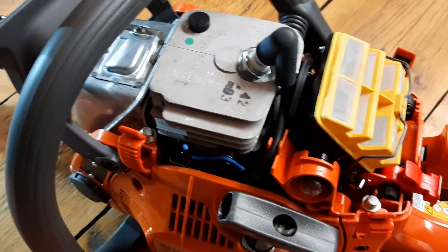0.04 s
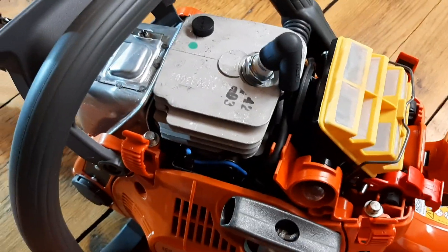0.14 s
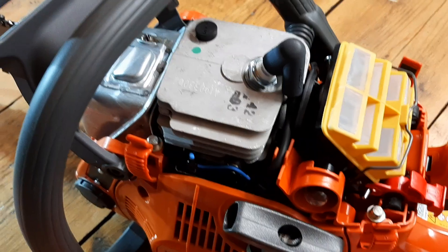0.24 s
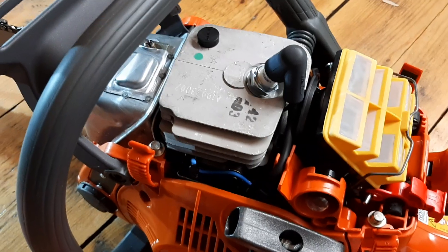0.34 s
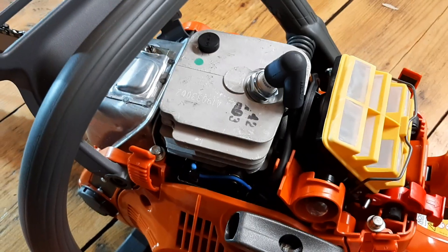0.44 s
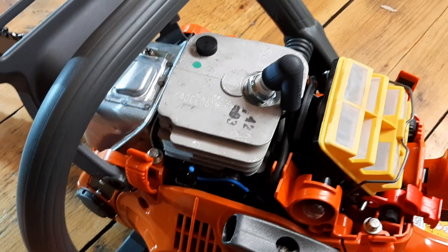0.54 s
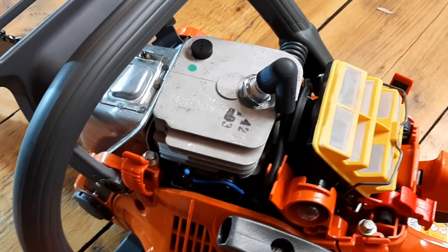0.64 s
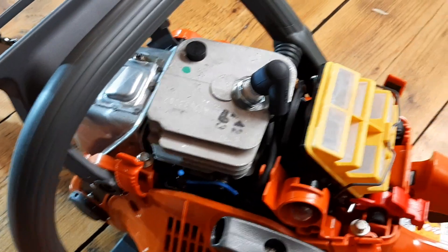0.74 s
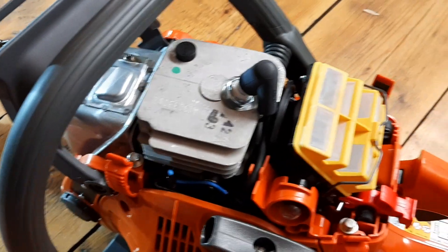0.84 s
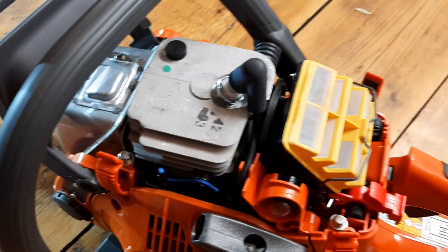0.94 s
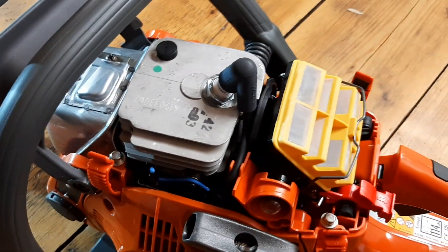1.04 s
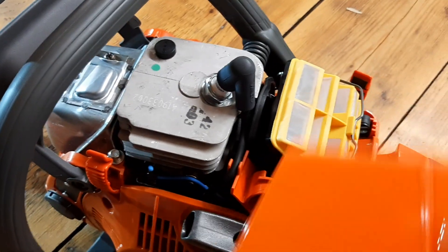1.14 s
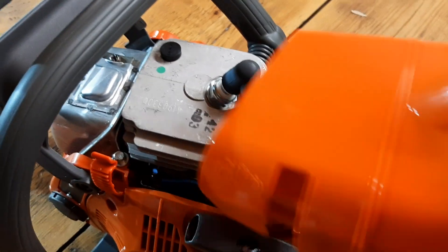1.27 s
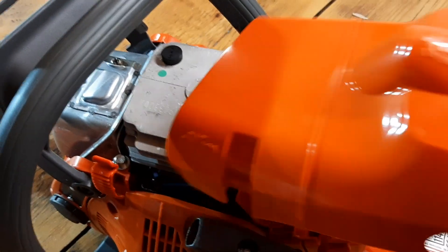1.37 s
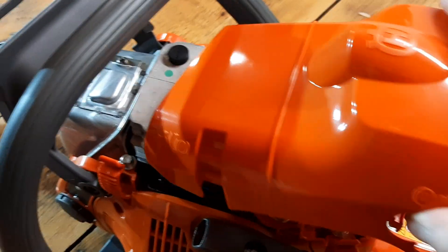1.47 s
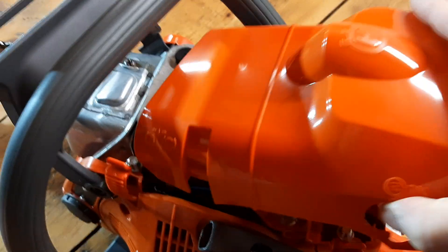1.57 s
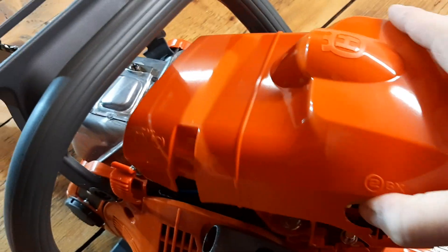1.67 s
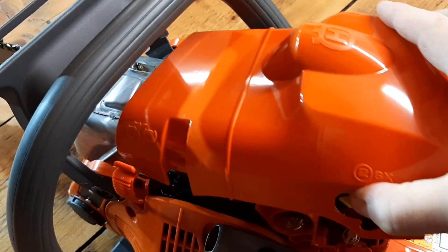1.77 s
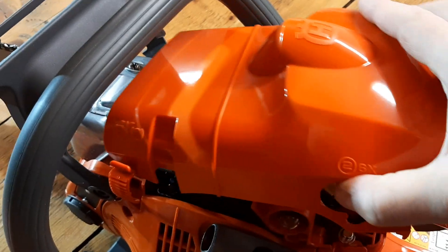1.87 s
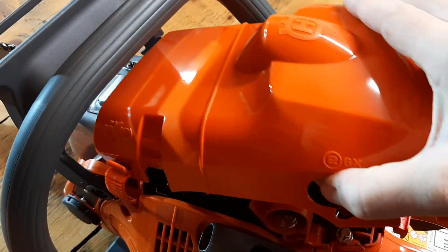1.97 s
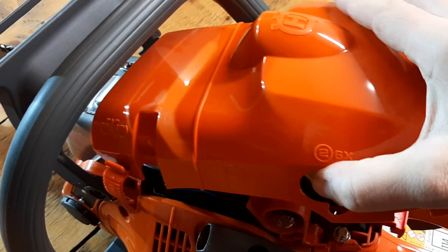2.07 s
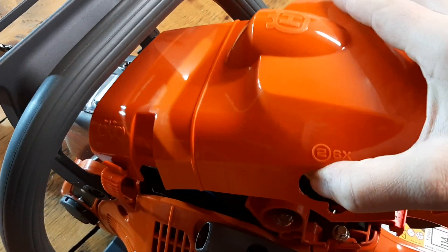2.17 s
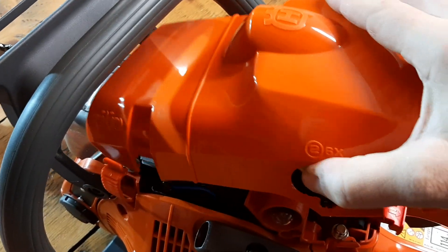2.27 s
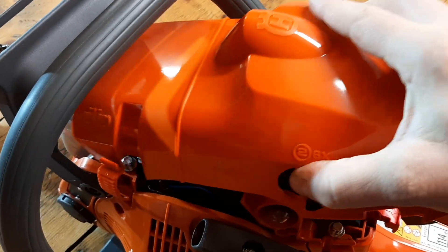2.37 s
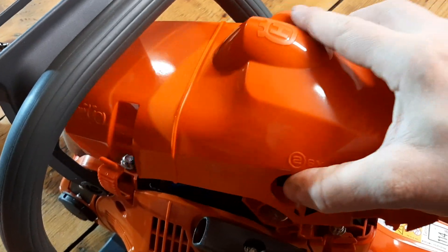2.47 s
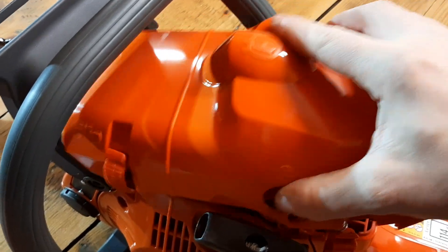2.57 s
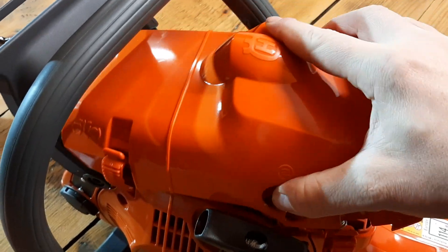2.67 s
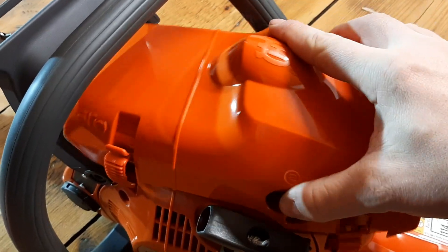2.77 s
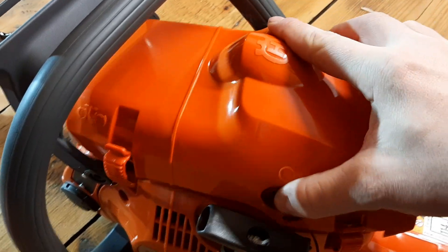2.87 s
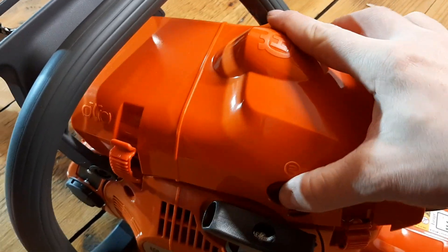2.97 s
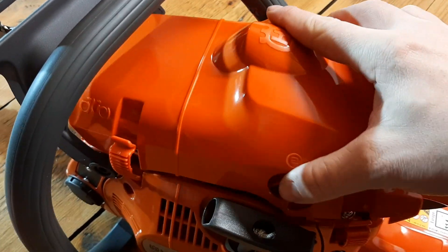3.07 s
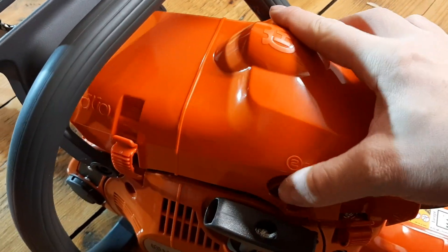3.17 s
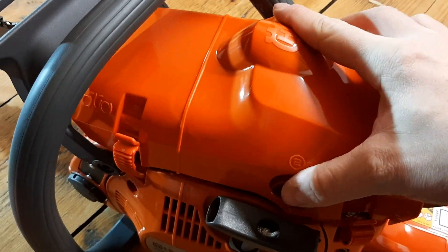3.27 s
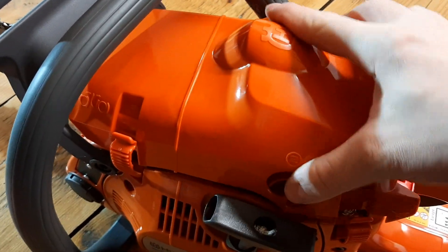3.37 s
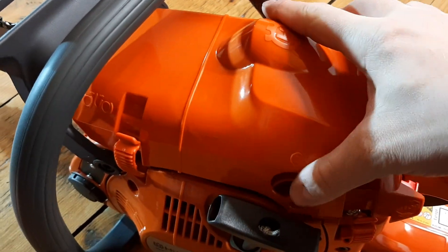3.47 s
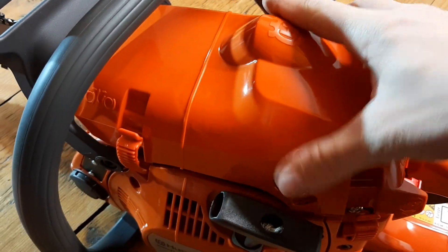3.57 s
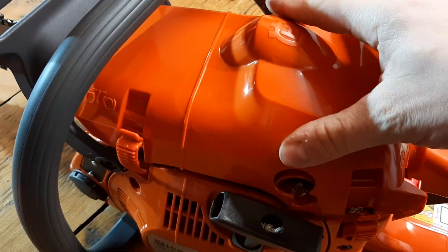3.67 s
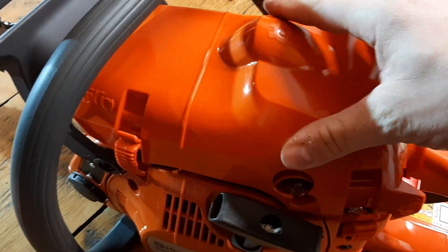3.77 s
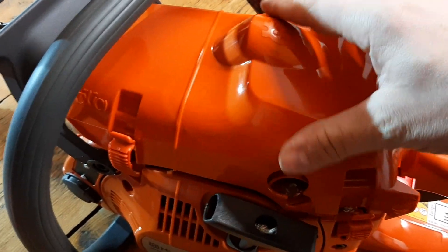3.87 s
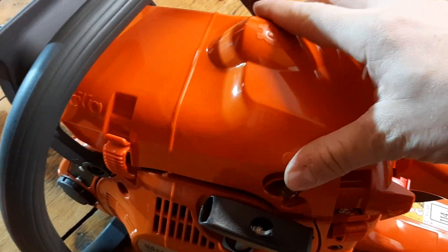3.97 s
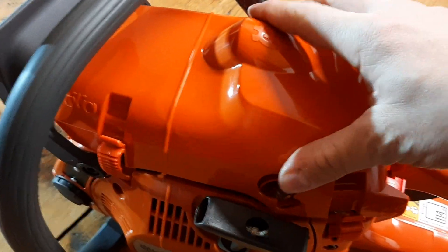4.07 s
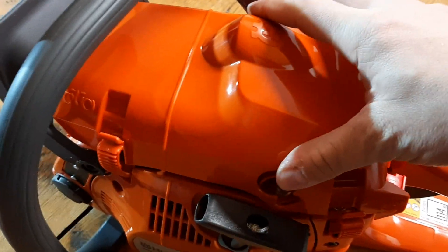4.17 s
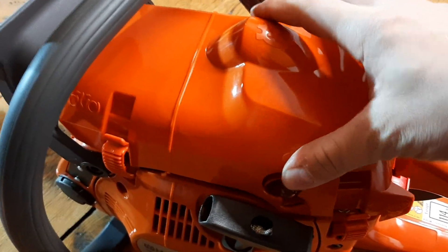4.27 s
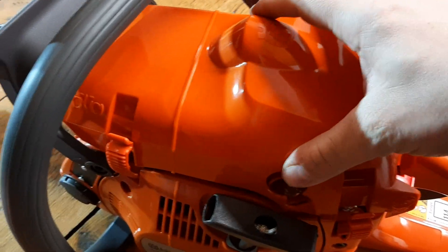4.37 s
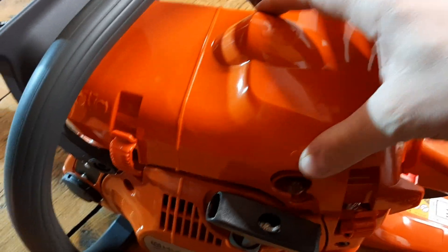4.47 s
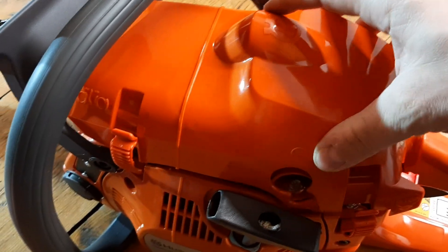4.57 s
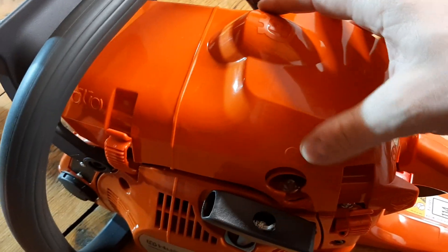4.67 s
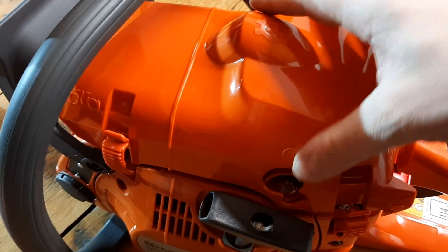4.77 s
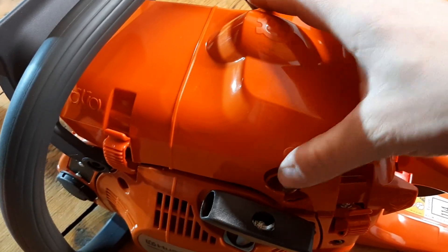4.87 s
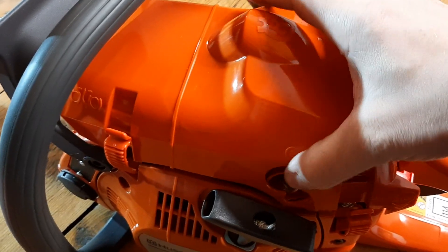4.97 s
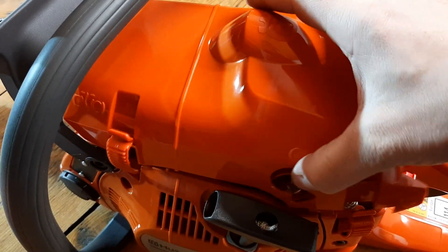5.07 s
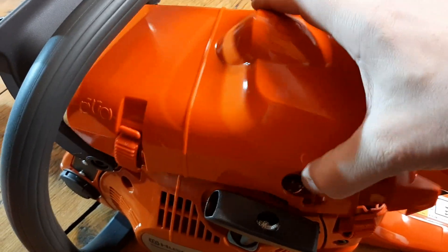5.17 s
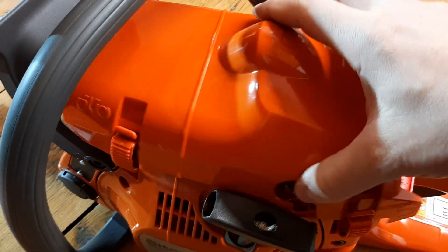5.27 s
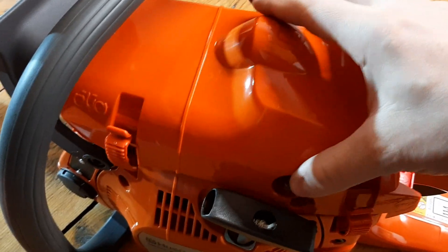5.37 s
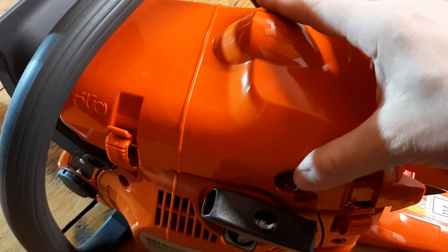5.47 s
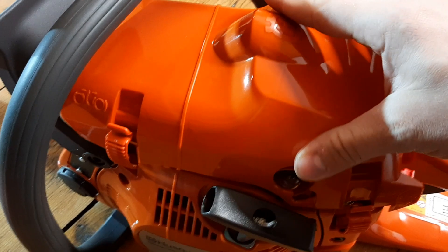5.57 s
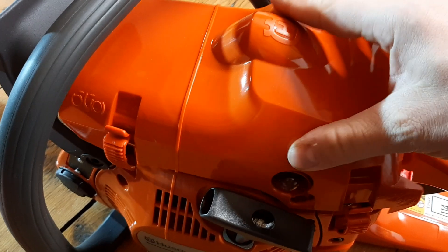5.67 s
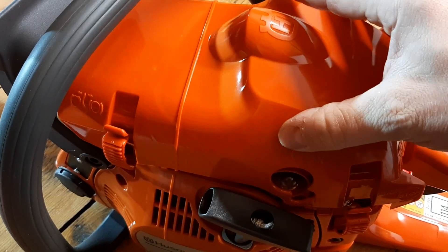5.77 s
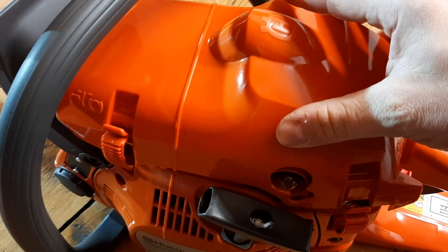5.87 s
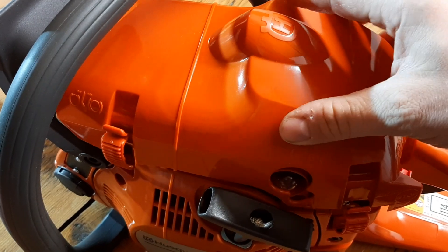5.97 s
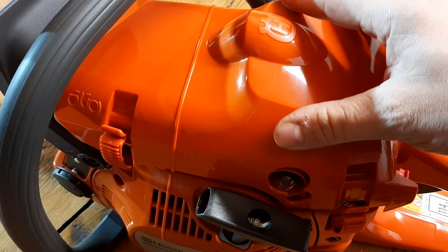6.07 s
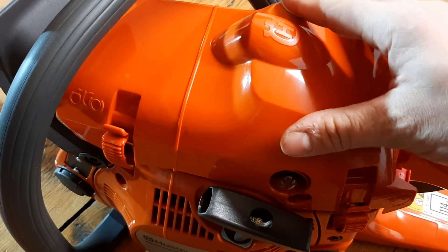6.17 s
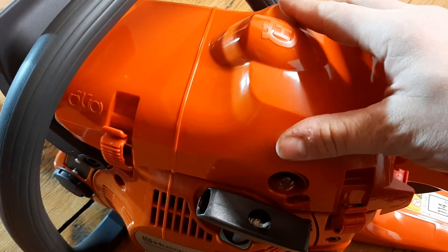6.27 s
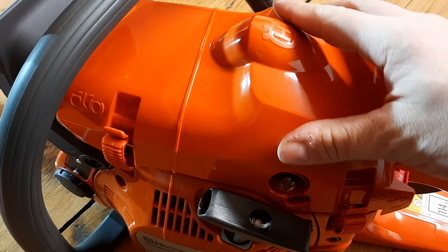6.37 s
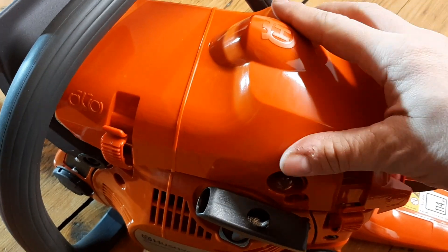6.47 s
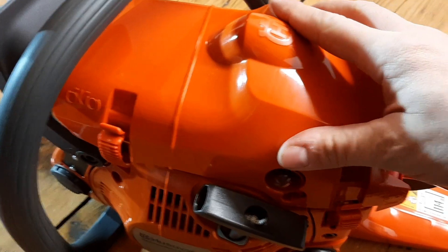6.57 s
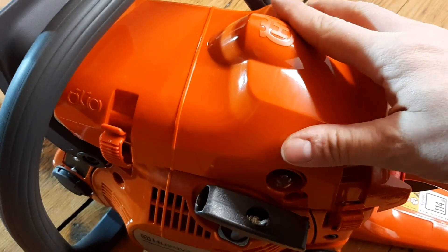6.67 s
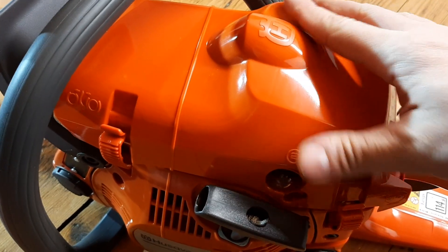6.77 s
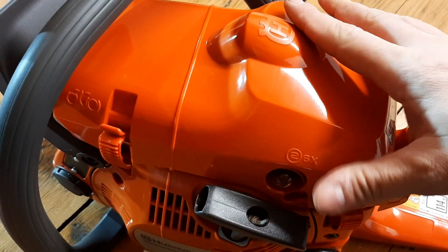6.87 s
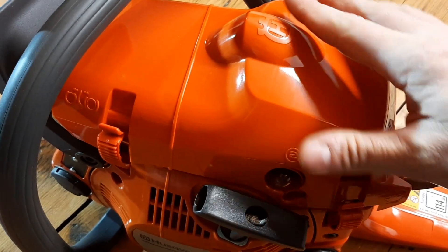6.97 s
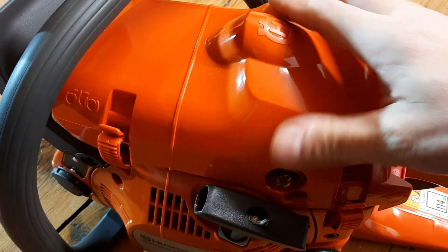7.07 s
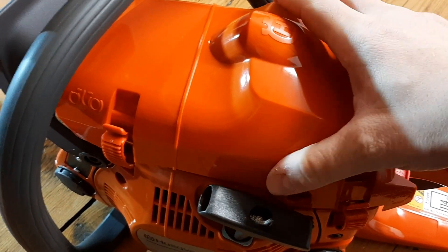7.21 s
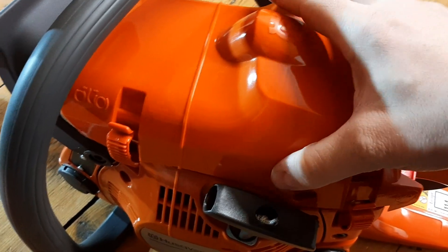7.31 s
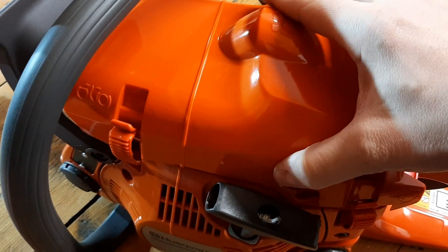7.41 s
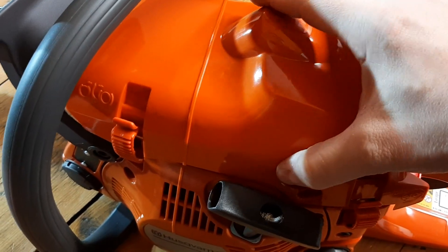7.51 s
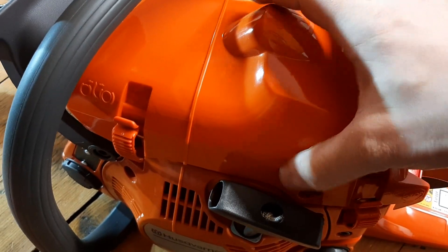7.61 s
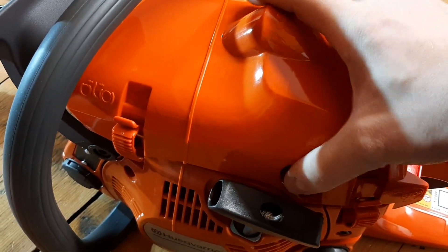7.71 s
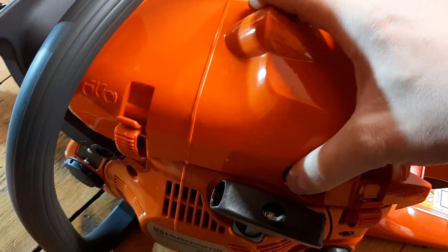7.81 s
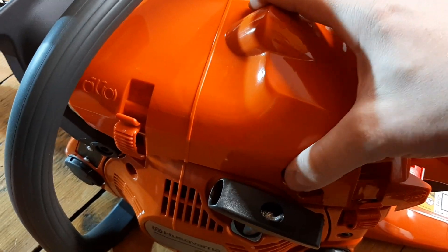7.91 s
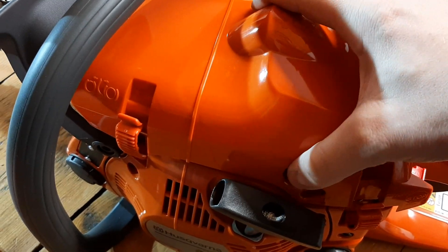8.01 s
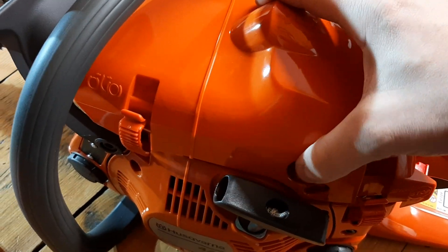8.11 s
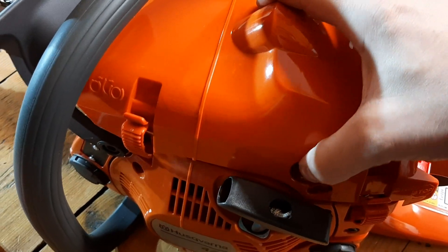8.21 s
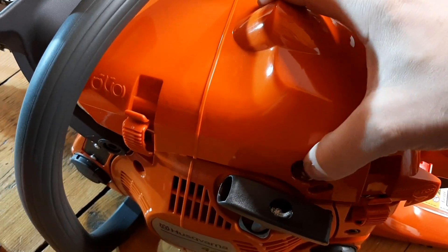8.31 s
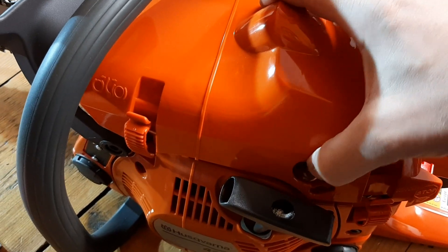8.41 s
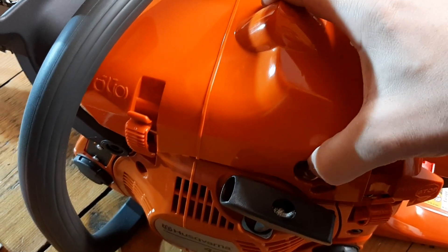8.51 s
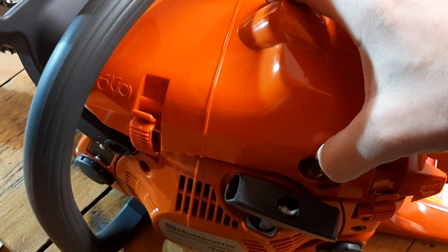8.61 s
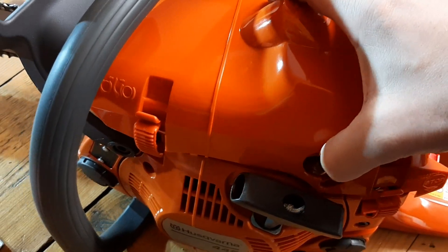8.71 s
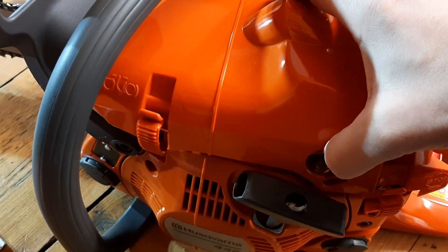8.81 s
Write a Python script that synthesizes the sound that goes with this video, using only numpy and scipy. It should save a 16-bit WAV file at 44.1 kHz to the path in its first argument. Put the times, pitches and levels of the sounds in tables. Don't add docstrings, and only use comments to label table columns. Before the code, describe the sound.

Close hollow plastic clatter and scraping, a burst of loud cracks with a tiny squeak, then scattered clicks and knocks in a quiet room.

```python
import sys
import numpy as np
from scipy import signal
from scipy.fft import rfft, irfft, next_fast_len
from scipy.io import wavfile
from scipy.ndimage import uniform_filter1d

SR = 44100
rng = np.random.default_rng(int(sys.argv[2]) if len(sys.argv) > 2 else 0)


def log_audio(samples):
    frames = np.atleast_2d(samples).T
    limited = np.clip(frames, -1, 1)
    pcm = np.round(limited * 32767).astype(np.int16)
    wavfile.write(sys.argv[1], SR, pcm)


def invert_db(level):
    return 10 ** (np.asarray(level, dtype=float) / 20)


N = 390285
MIC_LOW_HZ = 186

# frequency in Hz, level in dB, t60 in s.
BOARD_MODES = [(100, 0, .14), (140, 1, .15), (215, -9, .08), (328, -5, .11), (577, -22, .1)]


def level(x, db):
    return x * invert_db(db) / np.sqrt(np.mean(x ** 2))


def band(x, lo_hz, hi_hz, order=2):
    return signal.sosfilt(signal.butter(order, [lo_hz, hi_hz], "band", fs=SR, output="sos"), x)


def coloured(x, points):
    hz, db = np.transpose(points)
    size = 2 * next_fast_len(N // 2 + 1)
    f = np.maximum(np.arange(size // 2 + 1) * SR / size, 1)
    gain = invert_db(np.interp(np.log(f), np.log(hz), db, -99, -99))
    return level(irfft(rfft(x, size) * gain, size)[:, :N], 0)


def add(out, s, x):
    i = max(int(s * SR), 0)
    out[:, i:i + x.shape[1]] += x[:, :N - i]


def walk(rate_hz):
    k = int(SR / rate_hz)
    return uniform_filter1d(np.repeat(rng.standard_normal(N // k + 1), k), k)[:N]


def ring(modes, scatter_db, detune, spread, size=8192):
    port_lag_s = .000025
    hz, db, t60 = np.transpose(modes)[:, :, None]
    c = rng.standard_normal((3, len(modes), 1))
    t = np.arange(size) / SR
    hz = hz * (1 + detune * c[0])
    uptake = np.minimum(2.11 * hz * t, 1)
    swing = np.exp((2j * np.pi * hz - np.log(1000) / t60) * t) * uptake
    skew = np.pi * hz * port_lag_s + spread * c[2] * np.minimum(hz / 2000, 1)
    ports = invert_db(db + scatter_db * c[1]) * np.exp(1j * skew * np.array([1, -1]))
    return (ports.T @ swing).imag


def strike(response, contact_ms, db, rattle, spike_db=3.5, spike_s=0.00032):
    t = np.arange(2048) / SR
    push = rattle * rng.standard_normal(len(t)) ** 3 * np.exp(-t * 1000 / np.clip(contact_ms, .3, 30))
    push[0] = 1
    x = signal.fftconvolve(response, push[None])
    x = x * invert_db(spike_db * np.exp(-np.arange(x.shape[1]) / SR / spike_s))
    return x * invert_db(db) / np.abs(x.mean(axis=0)).max()


def air():
    # frequency in Hz, density in dB per Hz.
    air_spectrum = [(18, -40), (30, -7.5), (135, 1), (465, -11), (605, -2), (1050, -23.5), (3270, -16.5),
                    (5250, -8.5), (8220, -23), (15100, -19.5), (16300, -23.5)]
    n = rng.standard_normal((3, N))
    bass = signal.sosfilt(signal.butter(1, 600, fs=SR, output="sos"), n[0] - n[1:])
    tone = coloured(n[1:] + bass, air_spectrum)
    return level(tone, -71) * invert_db(0.67 * walk(26))


def room(x):
    # centre in Hz, t60 in s, level in dB.
    tail_bands = [(270, 0.12, -21.5), (650, 0.48, -19), (2130, 0.62, -16), (4960, 0.3, -22),
                  (11100, 0.029, -16.5)]
    t = np.arange(SR // 2 + SR // 4) / SR
    onset = np.minimum(t / 0.0056, 1)
    tail = 0
    for hz, t60, db in tail_bands:
        n = band(rng.standard_normal((3, len(t))), hz / 2.0, hz * 1.92)
        alike = np.clip(500 / hz, 0, 3)
        ports = (alike * n[0] + n[1:]) / np.sqrt(1 + alike ** 2)
        tail = tail + invert_db(db - 23.0 - 60 * t / t60) * ports * onset
    return signal.fftconvolve(x.mean(axis=0)[None], tail)[:, :N]


def machine_bumps(out):
    # time in s, peak in dB.
    bumps = [(7.633, -30), (7.758, -39.5), (7.808, -40), (7.973, -38.5), (8.075, -50.5), (8.141, -39.5),
             (8.26, -49), (8.392, -39), (8.615, -43.5), (8.659, -45), (8.716, -49)]
    for s, db in bumps:
        add(out, s, strike(ring(BOARD_MODES, 2.5, .04, .2), 12.8, db, rattle=.06))


def catch_ticks(out):
    # frequency in Hz, level in dB, t60 in s.
    catch_modes = [(1555, -6, .03), (5300, -10, .012)]
    # time in s, peak in dB.
    ticks = [(6.686, -66), (6.758, -63), (6.814, -65), (6.869, -67.5), (6.935, -61.5), (7.001, -61),
             (7.064, -59), (7.113, -55), (7.166, -61.5), (7.462, -59.5), (7.505, -51), (7.796, -57.5),
             (7.844, -63), (7.9, -56.5), (7.956, -60), (8.108, -60.5), (8.159, -70), (8.204, -68),
             (8.253, -64.5), (8.31, -57), (8.355, -64), (8.406, -66), (8.459, -65), (8.55, -60),
             (8.597, -64.5), (8.643, -73), (8.692, -74), (8.745, -62), (8.792, -63), (8.836, -66)]
    for s, db in ticks:
        response = ring(catch_modes, 1, .004, 0.92, size=1536)
        add(out, s, strike(response, 4.7, db + 4.0, rattle=0.09, spike_db=-39))


def rim_squeak(out):
    # frequency in Hz, level in dB, t60 in s.
    rim_modes = [(7500, -1.5, .012), (7100, -9, .008)]
    # time in s, peak in dB.
    slips = [
        (2.593, -23),
        (2.6065, -24.5),
        (2.611, -23.5),
        (2.6146, -23),
        (2.62, -16.5),
    ]
    for s, db in slips:
        response = ring(rim_modes, 1.0, .006, 0.8, size=768)
        add(out, s, strike(response, 0.86, db, rattle=.3, spike_db=-11.5))


def small_parts():
    out = np.zeros((2, N))
    machine_bumps(out)
    catch_ticks(out)
    rim_squeak(out)
    return band(out, 126, 6200)


def grit(rate_hz, scatter_db):
    c = rng.random((3, N))
    return (c[0] < rate_hz / SR) * np.sign(c[1] - .5) * invert_db(-scatter_db * np.log(c[2] + .01))


def strokes(table, rise_db_s, fall_db_s):
    rest_db = -88
    start, hold, *layers = np.transpose(table)[:, :, None]
    t = np.arange(N // 64 + 2) * 64 / SR
    shape_db = -rise_db_s * np.maximum(start - t, 0) - fall_db_s * np.maximum(t - start - hold, 0)
    power = [np.sum(invert_db(db + shape_db) ** 2, axis=0) + invert_db(rest_db) ** 2 for db in layers]
    return [np.interp(np.arange(N) / SR, t, 10 * np.log10(p)) for p in power]


def board_rumble(rumble_db):
    slips = grit(340, 4.2)[None] * invert_db(rumble_db - 2.0 + 2.6 * walk(27))
    return signal.fftconvolve(slips, ring(BOARD_MODES[:4], .1, .001, .2))[:, :N]


def shell_judder(judder_db):
    # frequency in Hz, level in dB, t60 in s.
    judder_modes = [(250, -6, .05), (335, 2.5, .055), (430, -2, .05), (525, -6, .045), (740, -5, .05),
                    (845, -11, .03), (1080, -14, .025)]
    pitch_ratios = (.86, 1, 1.14)
    out = np.zeros((2, N))
    for ratio in pitch_ratios:
        shell = ring(np.array(judder_modes) * [ratio, 1, 1], .1, .001, 0.33, size=3072)
        slips = grit(400, 2.7)[None] * invert_db(judder_db - 4.5 + 5.7 * walk(27))
        out += signal.fftconvolve(slips, shell)[:, :N]
    return out


def edge_scrape():
    # frequency in Hz, density in dB per Hz.
    scrape_spectrum = [(470, -14), (800, -6), (1070, -9), (1250, -3), (1830, -3), (2500, -1), (3200, -4),
                       (3700, -2.5), (6150, -5), (9500, -26), (12400, -43.5), (20900, -120)]
    seated_s = 3.5
    fine = np.array([grit(5000, 2.6) for _ in range(3)])
    scrape = coloured(fine[0] * 0.42 + fine[1:], scrape_spectrum)
    cavity = 0.65 * band(scrape, 3530, 4130) - 0.45 * band(scrape, 2300, 3200)
    return scrape + (np.arange(N) > seated_s * SR) * cavity


def skin_hiss(hiss_db, scrape_db):
    # frequency in Hz, density in dB per Hz.
    skin_spectrum = [(4710, -34.5), (8000, -3), (9400, -3), (12500, -1), (15700, -4), (16300, -6)]
    hiss = coloured(rng.standard_normal((2, N)), skin_spectrum)
    return hiss * (invert_db(hiss_db + 0.75 * walk(25)) + invert_db(scrape_db - 18.0))


def sliding():
    # start in s, hold in s, judder in dB, edge scrape in dB.
    slides = [(0, 0.047, -41, -52.5), (.17, 0.025, -36, -46.5), (.34, 0.15, -36.5, -52.5),
              (.54, 0.17, -55.5, -51), (.73, 0.093, -81, -47.5), (.85, 0.051, -55.5, -53.5),
              (.97, 0.049, -62, -52), (1.07, 0.19, -80, -62), (1.35, 0.37, -55, -60),
              (1.645, 0.015, -30, -41), (1.7, 0.12, -40, -48.5), (1.86, 0.13, -39.5, -52),
              (2.19, 0.01, -41.5, -51.5), (2.32, 0.11, -38.5, -48), (2.51, 0.091, -32, -44),
              (2.56, 0.039, -48, -27), (2.74, 0.12, -48.5, -48), (2.95, 0.23, -56, -62.5),
              (3.2, 0.1, -62, -54)]
    # start in s, hold in s, judder in dB, edge scrape in dB.
    rubs = [(3.674, 0.15, -51.5, -57), (3.899, 0.01, -71, -53), (3.981, 0.12, -51.5, -55.5),
            (4.32, 0.055, -51, -64), (4.423, .1, -51, -54), (4.843, 0.058, -71, -61.5),
            (5.103, 0.12, -38, -46.5), (5.301, 0.3, -50.5, -63.5), (5.649, 0.028, -47.5, -61),
            (5.7, 0.007, -56, -50.5), (6.002, 0.12, -41.5, -60), (6.135, 0.17, -55, -61),
            (6.422, 0.015, -52.5, -55), (6.498, 0.058, -61.5, -68.5), (7.109, 0.088, -66.5, -63),
            (7.286, 0.058, -68, -61.5), (7.33, 0.017, -57.5, -52), (7.41, 0.065, -65, -59.5),
            (7.626, 0.011, -48.5, -51.5), (7.697, 0.045, -43, -60), (7.872, 0.028, -51, -61),
            (7.985, 0.042, -55, -84.5), (8.078, 0.021, -51, -63), (8.297, 0.015, -47.5, -63),
            (8.55, 0.044, -64.5, -63.5), (8.637, .22, -53, -66)]
    # start in s, hold in s, board rumble in dB, skin hiss in dB.
    hand_moves = [(0, 0.056, -56.5, -66.5), (.2, 0.19, -71, -66.5), (.76, 0.023, -72, -53),
                  (1.66, 0.2, -61.5, -69), (2.4, 0.33, -60.5, -74), (2.85, 0.09, -66, -94),
                  (3.88, 0.18, -66, -71), (5.25, 0.16, -55, -76.5), (6.1, 0.13, -66, -70.5),
                  (7.2, 0.21, -87, -79), (7.78, 0.94, -53, -92)]
    judder_db, scrape_db = strokes(slides + rubs, rise_db_s=298.5, fall_db_s=181)
    rumble_db, hiss_db = strokes(hand_moves, rise_db_s=76.5, fall_db_s=56.5)
    rumble = invert_db(-14.5) * band(board_rumble(rumble_db), 55, 2200)
    judder = invert_db(-17.0) * band(shell_judder(judder_db), MIC_LOW_HZ, 2800)
    scrape = invert_db(scrape_db + 2.5 * walk(24)) * edge_scrape()
    return rumble + judder + scrape + invert_db(-3.0) * skin_hiss(hiss_db, scrape_db)


def lingering():
    # time in s, frequency in Hz, peak in dB, t60 in s.
    single_modes = [(1.804, 316.7, -36.5, 0.091), (1.822, 287.6, -37, 0.15), (1.973, 270, -38, .08),
                    (2.263, 550, -8.5, 0.008), (2.564, 721.3, -14.5, 0.15), (2.5809, 794, -2, 0.0067),
                    (2.592, 724, -13, .12), (3.088, 253, -38.5, 0.1), (3.103, 270, -39, 0.054),
                    (3.174, 266.7, -32.5, 0.033), (5.094, 737, -21.5, .2), (5.343, 7510, -52, 0.21),
                    (6.109, 1309, -11, 0.027), (6.108, 2132, -13, 0.023), (7.241, 1600, -23.5, 0.046),
                    (7.329, 1560, -34, 0.064), (7.329, 3720, -33.5, 0.03), (7.389, 3870, -38.5, 0.078)]
    out = np.zeros((2, N))
    for s, hz, db, t60 in single_modes:
        twins = [(hz, 0, t60), (hz * 1.05, -6., t60 / 2)]
        add(out, s, strike(ring(twins, 1, 0, 0.49), 1.9, db, rattle=0.21, spike_db=1))
    return band(out, MIC_LOW_HZ, 9000)


def spot(s):
    # time in s, body in Hz, lower middle in Hz, upper middle in Hz, upper over lower in dB.
    spots_loose = [(0.0004, 710, 1260, 2300, 0), (0.1499, 627, 1230, 2360, 16), (0.16, 202, 2300, 2350, 1),
                   (0.2053, 750, 1270, 2270, -3), (0.2181, 718, 1230, 2400, 3),
                   (0.3803, 693, 1240, 2400, -4), (0.4274, 320, 1220, 2440, 5),
                   (0.4522, 330, 1440, 2420, 13), (0.5173, 685, 1210, 2300, -12),
                   (0.835, 440, 1950, 3370, 3), (0.9629, 689, 1940, 2400, -12.5),
                   (1.6075, 640, 1250, 3340, 9), (1.614, 750, 2300, 3300, 11), (1.64, 690, 1100, 2860, 2),
                   (1.667, 700, 2130, 3530, 13), (1.9069, 300, 1250, 2820, -4),
                   (2.2629, 520, 1290, 3360, 4), (2.2856, 720, 1450, 3100, 7),
                   (2.4877, 346, 1100, 3480, -1.5), (2.5333, 680, 1800, 4200, 15.5),
                   (2.549, 700, 1200, 4240, 9), (2.581, 710, 1100, 3700, -8), (2.5882, 700, 1230, 3350, 10),
                   (2.732, 596, 2080, 2770, -10), (2.79, 714, 1240, 3100, 2),
                   (2.8112, 593, 2080, 3570, -1.5), (2.8818, 780, 1290, 4590, 7),
                   (2.9409, 626, 1510, 2950, 1)]
    # time in s, body in Hz, lower middle in Hz, upper middle in Hz, upper over lower in dB.
    spots_seated = [(3.1028, 665, 1930, 2370, -10), (3.1746, 630, 2110, 3270, -0.5),
                    (3.2266, 650, 2100, 5090, 21.5), (3.6494, 780, 1266, 4470, 12),
                    (3.7388, 940, 1800, 2400, 3), (4.0641, 746, 2104, 2900, -3),
                    (4.3229, 640, 1270, 3810, -5), (4.5583, 548, 1238, 4220, -9),
                    (4.9773, 591, 1186, 3870, -7), (5.0739, 780, 2100, 4260, 0.5),
                    (5.0855, 752, 1630, 2970, -2.5), (5.1134, 748, 2170, 2780, -13),
                    (5.126, 806, 1420, 3810, -6.5), (5.1878, 780, 1260, 2730, -5),
                    (5.2426, 650, 1220, 2270, 18), (5.2646, 840, 1140, 2900, -6),
                    (5.3427, 870, 2110, 2330, 1), (5.4808, 800, 2090, 2800, 3),
                    (5.5145, 540, 2150, 2290, 3.5), (5.6491, 370, 1230, 4180, -1.5),
                    (5.7361, 609, 1180, 3630, -4.5), (5.8011, 450, 2100, 2770, 1),
                    (5.9589, 380, 1280, 2790, 5), (6.0202, 700, 2040, 3030, 0),
                    (6.1091, 581.6, 1284, 2990, -2.5), (6.4306, 590, 1130, 4900, 4),
                    (6.6016, 570, 1103, 3114, -20.5), (7.2385, 614, 1610, 3700, 7),
                    (7.2649, 650, 1550, 3700, 1), (7.3226, 556, 1560, 3780, -9),
                    (7.3901, 600, 1480, 3800, 10.5), (7.5982, 580, 1500, 2180, 1),
                    (7.7275, 514, 1680, 3320, -2)]
    return min(spots_loose + spots_seated, key=lambda row: abs(row[0] - s))[1:]


def woken(modes, hz):
    fall_db_oct = 6.
    f, db, t60 = np.transpose(modes)
    db = db - db.max() - fall_db_oct * np.abs(np.log2(f / hz))
    struck = (hz, -.5, .075)  # Hz, dB, t60 s
    return np.vstack([np.transpose([f, db, t60]), struck])


def panels(modes, lo_hz, hi_hz, upper_db):
    panel_db, panel_t60_s, fall_db_oct = 4., .027, 5.
    f, _, t60 = np.transpose(modes)
    lower = -fall_db_oct * np.abs(np.log2(f / lo_hz))
    upper = upper_db - fall_db_oct * np.abs(np.log2(f / hi_hz))
    pair = [(hz, panel_db + up, panel_t60_s * np.sqrt(1000 / hz))
            for hz, up in ((lo_hz, 0), (hi_hz, upper_db + 6.0))]
    return np.vstack([np.transpose([f, np.maximum(lower, upper), t60]), pair])


def crowd(lo_hz, hi_hz, contact_ms, count):
    # frequency in Hz, level in dB.
    strength = np.array([(1400, 19), (2500, -13), (4300, 5.5), (5000, -5), (7400, -8), (8800, -42.5),
                         (10000, -23.5), (11000, -28.5), (13500, -21.5), (15500, -24.5)])
    t60_s_per_ms = .011
    hz = lo_hz * (hi_hz / lo_hz) ** ((np.arange(count) + rng.random(count)) / count)
    db = np.interp(np.log(hz), np.log(strength[:, 0]), strength[:, 1])
    return np.transpose([hz, db, t60_s_per_ms * np.clip(contact_ms, 1, 8) * np.sqrt(1000 / hz)])


def to_walls(body):
    return invert_db(5.) * np.exp(-np.arange(body.shape[1]) / SR / .006) * body


def lift(near, far):
    # frequency in Hz, level in dB, t60 in s.
    hollow_modes = [(205, -7, .07), (328, -8, .08), (500, -10, .04), (716, 0, .07)]
    # frequency in Hz, level in dB, t60 in s.
    bright_modes = [(1220, -4, .05), (1470, -9, .03), (1900, -8, .02), (2390, 0, .035), (2640, -9, .02),
                    (3250, -10, .015), (3900, -11, .012), (5000, -12, .01), (6500, -16, .008)]
    # time in s, hollow peak in dB, bright peak in dB, contact in ms.
    pickup = [(0.0004, -35.5, -43, 7), (0.1499, -33.5, -39, 31), (0.16, -33, -39, 4.8),
              (0.1801, -31.5, -47, 2), (0.2053, -35.5, -36, 21), (0.2181, -25.5, -31, 7.5),
              (0.231, -22, -34.5, 4.3), (0.356, -37.5, -39.5, 39), (0.3803, -22.5, -38, 26),
              (0.3975, -31.5, -36, 30), (0.4274, -28.5, -34.5, 25), (0.4522, -36, -28.5, 2.3),
              (0.5173, -34, -30.5, 14), (0.9629, -27.5, -21, 5.6)]
    for s, hollow_db, bright_db, contact_ms in pickup:
        body_hz, *middle_spot = spot(s)
        response = ring(woken(hollow_modes, body_hz), 2., .01, .2, size=3072)
        body = strike(response, contact_ms, hollow_db, rattle=.12)
        response = ring(panels(bright_modes, *middle_spot), 0.77, 0.014, 0.89, size=2048)
        bright = strike(response, contact_ms, bright_db, rattle=0.6)
        response = ring(crowd(1710, 6200, 1, count=24), 2.6, 0, 0.49, size=768)
        upper = strike(response, 1.3, bright_db - 0.36 * contact_ms, rattle=0.23)
        for part in (body, bright, upper):
            add(near, s, part)
        add(far, s, to_walls(body))


def knocks(near, bright, far):
    # frequency in Hz, level in dB, t60 in s.
    body_modes = [(210, -21, 0.02), (264, -18.5, .06), (324, -10, 0.089), (413, -2, 0.031), (520, -1, 0.11),
                  (562, 0.5, 0.08), (596, 1, 0.1), (694, 3, 0.13), (748, -3, 0.049), (783, -4.5, 0.091),
                  (1000, -5, 0.0068), (1070, -5, 0.04)]
    # time in s, body peak in dB, middle in dB, edge in dB.
    fitting = [(0.836, -56.5, -16, -25.5), (1.2335, -75, -69.5, -49), (1.6073, -11.5, -16.5, -30),
               (1.614, -19.5, -31.5, -31.5), (1.626, -20.5, -22, -37.5), (1.64, -23.5, -25, -35),
               (1.667, -49, -30, -48), (1.9066, -38, -32, -64.5), (1.949, -35.5, -30.5, -73),
               (1.9739, -35.5, -35, -87), (2.1448, -45.5, -40, -62), (2.2487, -48, -39.5, -55.5),
               (2.2631, -11.5, -15.5, -34), (2.2847, -19.5, -12.5, -17.5), (2.2954, -18, -14, -32.5),
               (2.4252, -34.5, -31, -38.5), (2.4877, -26, -36.5, -46), (2.505, -30.5, -32.5, -44.5),
               (2.518, -33, -29.5, -42), (2.5333, -4.5, -8, -11), (2.549, -8, -7.5, -5.5),
               (2.557, -12.5, -2.5, -13.5), (2.581, -11.5, -13, -19), (2.5882, -10.5, -6.5, -9.5),
               (2.6135, -24.5, -29, -41), (2.732, -27, -25, -36.5), (2.791, -19, -25.5, -32),
               (2.8101, -22.5, -15.5, -29), (2.8604, -23.5, -57, -50), (2.8813, -18.5, -13.5, -28),
               (2.94, -32, -24.5, -65)]
    # time in s, body peak in dB, middle in dB, edge in dB.
    seating = [(3.0847, -32.5, -32, -61), (3.1027, -31.5, -29, -44), (3.174, -30, -22, -33),
               (3.2268, -64.5, -21, -14.5), (3.3346, -40.5, -58, -52.5), (3.6489, -47, -32.5, -36.5),
               (3.7377, -32.5, -38, -59), (3.7553, -42, -58, -39), (3.9016, -40.5, -71, -37.5),
               (3.984, -50.5, -48.5, -51.5), (4.0438, -46.5, -38.5, -53), (4.063, -31.5, -22.5, -26),
               (4.2369, -51.5, -67, -70), (4.3227, -20, -30.5, -47.5), (4.35, -44.5, -60, -59),
               (4.5572, -41.5, -40, -46.5), (4.9768, -38, -52, -56.5), (5.054, -43, -32.5, -36.5),
               (5.0757, -28, -23, -31.5), (5.0857, -30, -9.5, -20.5), (5.095, -30, -25.5, -46),
               (5.113, -26.5, -12.5, -33), (5.126, -19, -13.5, -19), (5.141, -21.5, -21, -37.5),
               (5.1805, -21, -49.5, -49.5), (5.1875, -22, -23.5, -67), (5.2413, -24, -23, -42.5),
               (5.2643, -6, -9, -68.5), (5.3434, -50, -17.5, -23.5),
               (5.4828, -36.5, -31.5, -64), (5.5144, -26.5, -17, -55), (5.65, -36, -41, -56),
                (5.6822, -42.5, -37.5, -58), (5.7368, -37.5, -44, -50), (5.8014, -37, -41.5, -63),
                (5.9586, -40, -41.5, -53), (6.0196, -31, -20, -46.5), (6.096, -33.5, -31.5, -38),
                (6.1088, -2.5, -6, -25.5), (6.4305, -36, -45, -50), (6.6021, -46, -52.5, -82.5),
                (6.6123, -43.5, -50, -56.5), (7.1735, -53.5, -51.5, -43), (7.2274, -45, -33.5, -62.5),
                (7.2389, -32.5, -15.5, -34), (7.2647, -35.5, -26, -54), (7.3233, -38.5, -37.5, -34.5),
                (7.3915, -40, -39, -36), (7.5979, -17, -24, -42), (7.7102, -47, -36, -48.5),
                (7.7263, -40, -35, -51), (8.834, -44.5, -49.5, -46.5)]
    cracks = np.zeros((2, N))
    left = invert_db(np.array([[1.2], [-1.2]]))
    for s, body_db, middle_db, edge_db in fitting + seating:
        contact_ms = 4.38 * invert_db(-0.14 * (middle_db - body_db))
        body_hz, *middle_spot = spot(s)
        response = ring(woken(body_modes, body_hz), 2.8, 0.036, .15, size=3072)
        body = strike(response, contact_ms, body_db, rattle=0.03, spike_db=8.0, spike_s=0.003)
        middle_modes = panels(crowd(1200, 5200, contact_ms, count=26), *middle_spot)
        middle = strike(ring(middle_modes, 2, 0, 0.8, size=1024), contact_ms * .9, middle_db, rattle=0.06)
        edge_modes = crowd(4600, 15500, contact_ms, count=20)
        edge = strike(ring(edge_modes, 1.4, 0, 1.0, size=768), contact_ms, edge_db, rattle=0.4)
        add(near, s, body)
        add(near, s, left * middle)
        add(bright, s, left * edge)
        add(far, s, to_walls(body))
        add(far, s, invert_db(-10.) * middle)
        cracks[:, int(s * SR)] = invert_db(np.array([middle_db, edge_db])) * np.sqrt(contact_ms)
    return cracks


def cover_blows():
    near, bright, far = np.zeros((3, 2, N))
    cracks = knocks(near, bright, far)
    lift(near, far)
    far += invert_db(12.0) * band(cracks[0], 1500, 4800) + invert_db(13.5) * band(cracks[1], 6200, 6300)
    thump = invert_db(-8.5) * band(near, 85, 150)
    near, far = band([near, far], MIC_LOW_HZ, 5900, order=4)
    return near + thump + band(bright, 6600, 16500), far


def scene():
    near, far = cover_blows()
    small = small_parts()
    echo = invert_db(-18) * np.roll(near, int(0.0077 * SR), axis=1)
    work = near + echo + small + room(far + invert_db(-14) * small) + sliding()
    return work * invert_db(np.array([[.4], [-.4]])) + air() + lingering()


def band_limit(x):
    return signal.sosfilt(signal.butter(12, 15750, fs=SR, output="sos"), x)


def record(dry):
    mix = 1.142 * np.tanh(0.83 * dry)
    return band_limit(mix)


dry = scene()
out = record(dry)
log_audio(out)
```